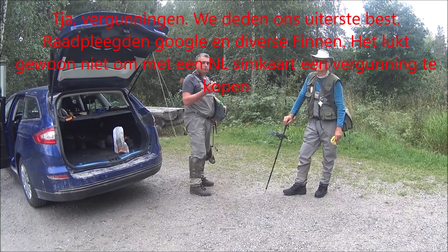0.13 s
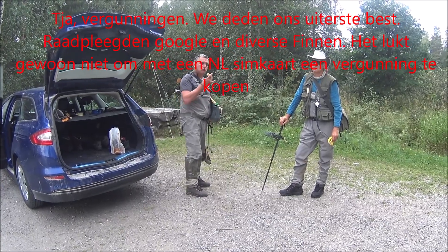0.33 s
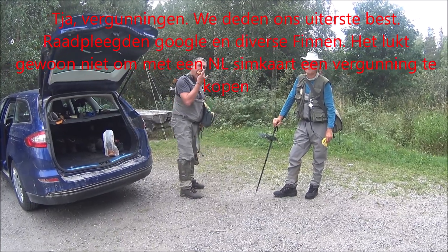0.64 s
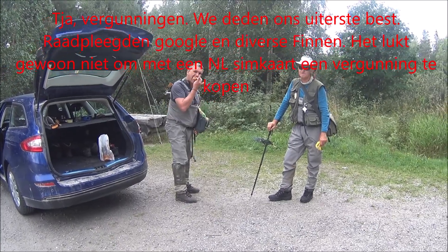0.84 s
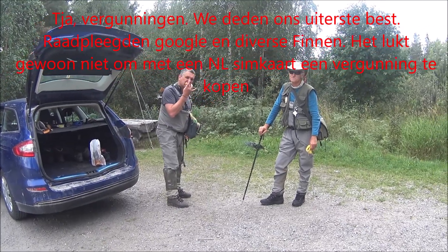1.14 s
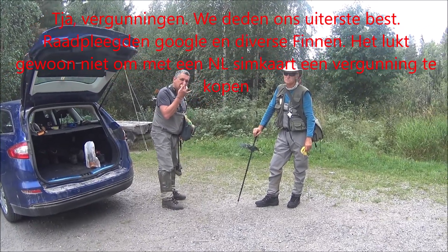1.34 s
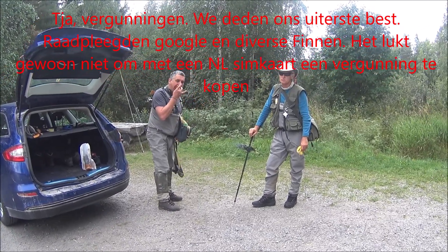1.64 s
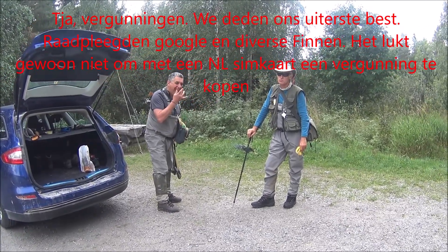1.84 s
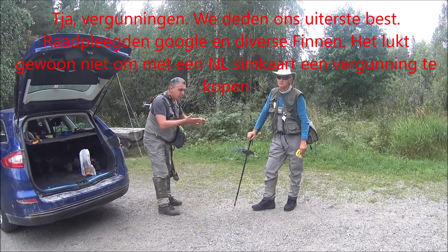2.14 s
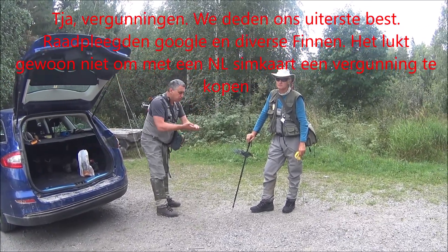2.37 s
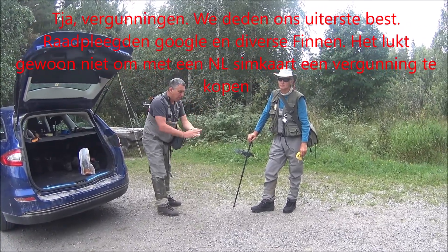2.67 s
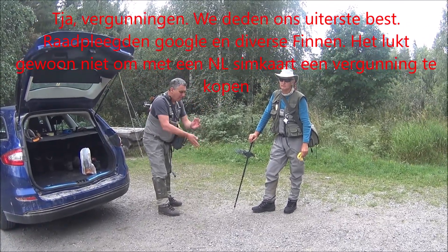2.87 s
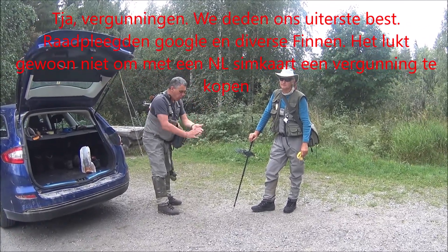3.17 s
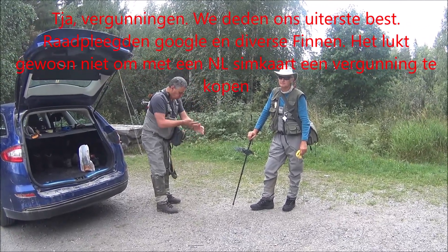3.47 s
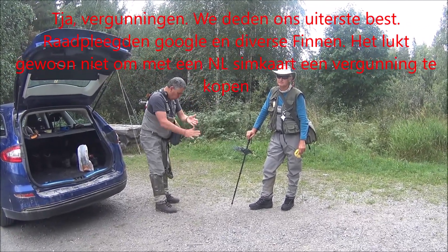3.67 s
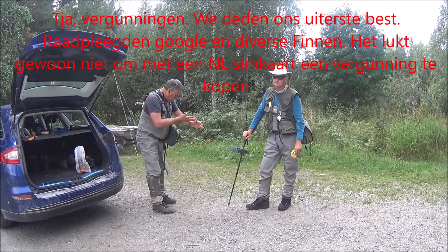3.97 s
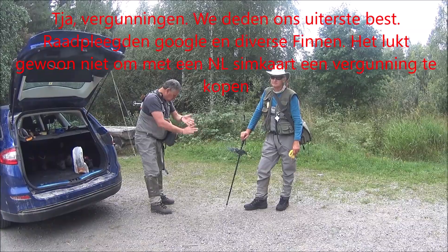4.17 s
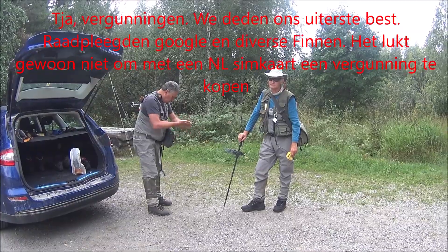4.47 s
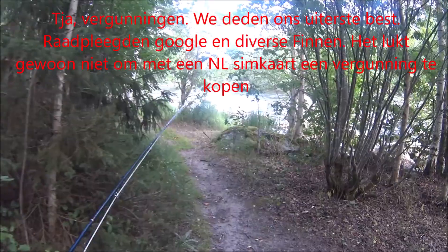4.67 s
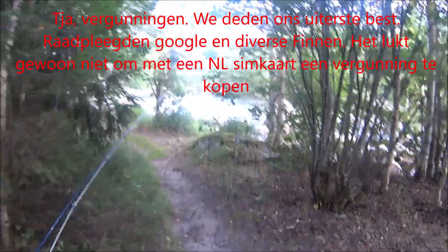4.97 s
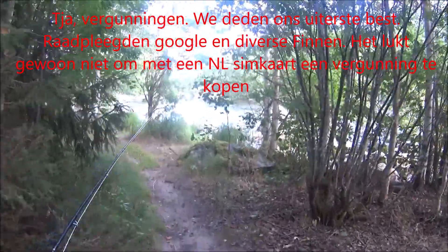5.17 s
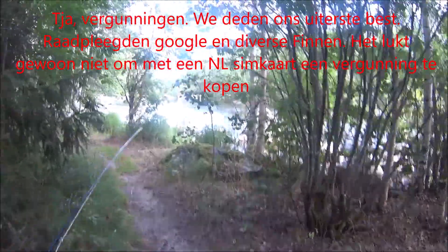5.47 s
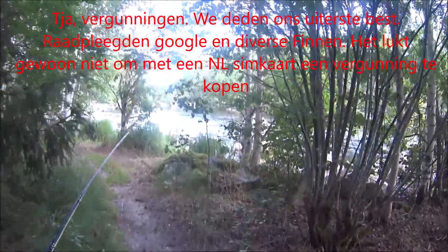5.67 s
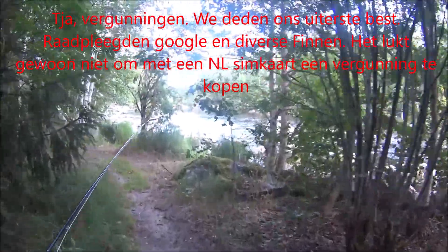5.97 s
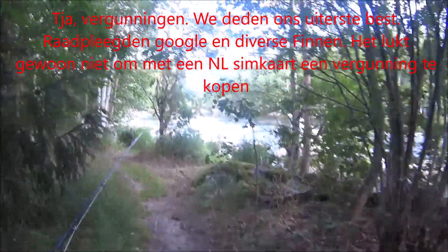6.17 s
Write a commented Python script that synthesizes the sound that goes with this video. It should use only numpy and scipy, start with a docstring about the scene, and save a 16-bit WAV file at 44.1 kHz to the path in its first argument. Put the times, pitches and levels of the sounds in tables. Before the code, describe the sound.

A muffled, boxy camera held still picks up a distant, steady water hush, one early slap with a clink, soft handling taps, then a run of crisp hand slaps with gear clicks. After a sudden cut the hush grows louder and ticks more densely, and the carried case gives hard hollow knocks, rattling clicks and scraping, ending on a loud bump.

```python
"""Hands slap together and gear clicks and clinks beside a small camera in a closed plastic case near a river.
The camera is first held still, then carried along a path. Slaps, and the sharp onset of the clink, are short
noise puffs with a resonant air pocket. Knocks and rubbing excite damped modes of the case walls; palm thumps
are low, fast-dying swings. Behind them, far water is steady noise coloured by the case cavity, with faint ticks
and a little hiss."""
import sys
import numpy as np
from scipy import signal
from scipy.fft import rfft, irfft
from scipy.io import wavfile
from scipy.ndimage import minimum_filter1d

SR = 44100
rng = np.random.default_rng(int(sys.argv[2]) if len(sys.argv) > 2 else 0)


def invert_db(level):
    """Linear amplitude ratio for a level in decibels (20 dB per decade), elementwise."""
    return 10 ** (np.asarray(level, dtype=float) / 20)


def generate_wav(sig):
    """Save sig (samples, or channels by samples) to the path in sys.argv[1] as 16-bit PCM at SR."""
    pcm = np.round(np.clip(np.atleast_2d(sig).T, -1, 1) * 32767).astype(np.int16)
    wavfile.write(sys.argv[1], SR, pcm)


N = 278271   # samples in the scene
SPAN = 8192   # samples in one event
CARRIED_S = 4.67   # the walk begins

# spectrum that the case lets through to the microphones: (frequency [Hz], relative level [dB per Hz])
CASE_RESPONSE = [(30, -36), (110, -29), (260, -13), (420, -15), (1080, -12), (1240, -2.5), (1340, 3),
                 (1480, -4), (1700, -7), (1980, -11), (2400, -5), (3400, -17), (4600, -15), (6000, -22.5),
                 (7800, -34), (10500, -50.5), (13500, -44.5), (16500, -38)]
# resonances of the case walls: (frequency [Hz], relative strength [dB])
CASE_WALL_MODES = [(590, 3), (690, -9), (790, 5), (970, 4.5), (1120, -4), (1250, 1.5), (1360, 4),
                   (1490, -1), (1610, 2), (1750, 3.5), (1900, -28), (2150, -2.5)]


def rms_one(x):
    """Normalisation to unit effective value."""
    return x / np.sqrt(np.mean(x ** 2, axis=-1, keepdims=True) + 1e-20)


def peak_one(x):
    """Normalisation to unit peak value."""
    return x / (np.max(np.abs(x), axis=-1, keepdims=True) + 1e-12)


def in_time(rows):
    """Envelope interpolation: straight lines between timed points, one curve per column."""
    s, *columns = np.transpose(rows)
    return [np.interp(np.arange(N) / SR, s, c) for c in columns]


def at_hz(points, hz):
    """Spectral interpolation: levels joined by straight lines over log frequency."""
    point_hz, point_db = np.transpose(points)
    return np.interp(np.log(hz + 1), np.log(point_hz), point_db)


def highpass(x, hz):
    """Second-order high-pass filtering."""
    return signal.sosfilt(signal.butter(2, hz, "high", fs=SR, output="sos"), x)


def lowpass(x, hz):
    """Second-order low-pass filtering."""
    return signal.sosfilt(signal.butter(2, hz, fs=SR, output="sos"), x)


def band(x, low_hz, high_hz, order=2):
    """Band-pass filtering with maximally flat response."""
    return signal.sosfilt(signal.butter(order, [low_hz, high_hz], "band", fs=SR, output="sos"), x)


def drift(rate_hz, channels=1):
    """Low-passed noise: a slow random wander of unit effective value, computed every 40 samples."""
    r = np.exp(-80 * np.pi * rate_hz / SR)
    noise = rng.standard_normal((channels, N // 40 + 2002))
    slow = signal.lfilter([1], [1, -2 * r, r * r], noise)[:, 2000:]
    return np.array([np.interp(np.arange(N) / 40, np.arange(len(s)), s) for s in rms_one(slow)])


def through(x, points):
    """Minimum-phase filtering: the folded cepstrum gives the causal response of a given spectrum."""
    hz = np.arange(SPAN // 2 + 1) * SR / SPAN
    cepstrum = irfft(np.log(invert_db(at_hz(points, hz))))
    cepstrum[1:SPAN // 2] *= 2
    cepstrum[SPAN // 2 + 1:] = 0
    response = irfft(np.exp(rfft(cepstrum)))[:SPAN // 2]
    return signal.fftconvolve(x, response[None], axes=1)[:, :x.shape[1]]


def place(times, sounds):
    """Superposition: stereo sounds (events, 2, samples) add up at their times."""
    out = np.zeros((2, N + SPAN))
    for s, sound in zip(times, sounds):
        start = round(s * SR)
        out[:, start:start + sound.shape[1]] += sound
    return out[:, :N]


def spread(mid, side):
    """Partial coherence: two microphones share most of the sound; a weaker part differs."""
    # weight of the differing part: (frequency [Hz], filter gain [dB])
    side_gain = [(60, -22), (150, -18), (380, -4), (950, -11.5), (2380, -8.5), (5980, -10), (15000, -10)]
    side = through(side, side_gain)
    return np.stack([mid + side, mid - side], axis=-2)


def airborne():
    """Impulsive sources in air: columns of time, treble dB, middle and bass dB re treble, ms, pocket Hz."""
    # hand slaps, and the sharp onset of the clink at 0.266 s: (time of peak [s], treble peak [dB], # bass re
    # treble [dB], length scale [ms], air-pocket pitch [Hz])
    slaps_and_clink_onset = [(0.2661, -16.5, -3.5, 0.53, 5600), (2.3671, -11.5, -7.5, 1.96, 3450),
                             (2.7141, -12.5, -15, 1.5, 1780), (2.968, -18.5, 0.5, 2.24, 2470),
                             (3.1984, -8, -22, 1.13, 2900), (3.4137, -14, -1, 2.3, 2630),
                             (3.654, -9.5, -41, 0.9, 2660), (3.8932, -8, -6, 1.16, 2770),
                             (4.1492, -7.5, -48, 0.78, 2880), (4.4213, -13, -10.5, 0.9, 2940),
                             (5.0722, -14.5, -21, 0.92, 4900)]
    # thin bright ticks and swishes, perhaps fingers parting or cloth:
    # (time [s], treble peak [dB], length scale [ms], pocket pitch [Hz])
    bright_ticks = [(0.283, -28, 5.3, 5640), (0.324, -38.5, 25, 5750), (0.531, -34, 0.65, 4570),
                    (1.476, -36.5, 0.59, 4480), (1.8162, -32, 0.34, 5700), (1.8587, -38, 0.5, 5030),
                    (1.884, -38, 1.3, 4900), (2.816, -29.5, 0.78, 5660), (2.958, -30, 0.59, 4900),
                    (3.006, -39, 17, 5400), (3.114, -27.5, 0.46, 6300), (3.286, -27.5, 0.8, 6600),
                    (3.779, -34.5, 0.81, 6100), (4.0155, -22, 0.2, 5800), (4.2835, -22, 0.48, 6340),
                    (4.5059, -28, 0.19, 5170), (4.944, -33, 0.8, 5300), (4.999, -34, 0.98, 5340),
                    (5.0957, -17, 0.49, 4800), (5.107, -35, 1.2, 8100), (5.1395, -27, 0.4, 4150),
                    (5.5676, -25, 0.5, 5570), (6.205, -33, 1.4, 6000), (6.233, -34.5, 2.3, 5000)]
    # gear clicking against the case: (time [s], treble peak [dB], middle re treble [dB], bass re middle [dB])
    gear_clicks = [(0.7032, -39.5, 4.5, -1), (2.4035, -28, 4, -9), (2.413, -21.5, 7, -5),
                   (2.4176, -17.5, -3.5, 3), (2.4351, -22, 8.5, -7), (2.4417, -20, 7.5, -2),
                   (2.5396, -27, -4, 8.5), (4.0372, -20.5, 15, 0), (5.0859, -21, 4.5, -12),
                   (5.118, -22, 6.5, -8), (5.2019, -19.5, 6, -12), (5.3585, -39.5, 15.5, -7),
                   (5.429, -32, 0.5, -14), (5.533, -33.5, 11, -7), (5.679, -23.5, 4, -5),
                   (5.7381, -20.5, 3.5, -19), (6.211, -24, -4, -21)]

    rows = [(s, db, -0.5, bass, ms, hz) for s, db, bass, ms, hz in slaps_and_clink_onset]
    rows += [(s, db, -28, -27, ms, hz) for s, db, ms, hz in bright_ticks]
    for s, db, middle, bass in gear_clicks:
        ms = 0.71 + 0.04 * (middle - 5)   # clicks with a stronger middle last longer
        rows.append((s, db, middle, middle + bass, ms, 2380))
    return np.transpose(rows)[:, :, None]


def pocket(puffs, pocket_hz, boost_db, q):
    """Cavity resonance: each puff rings briefly at its own pitch."""
    out = []
    for puff, hz in zip(puffs, pocket_hz):
        r = np.exp(-np.pi * hz / q / SR)
        poles = [1, -2 * r * np.cos(2 * np.pi * hz / SR), r * r]
        rung = signal.lfilter([(1 - r * r) / 2, 0, (r * r - 1) / 2], poles, puff)
        out.append(puff + invert_db(boost_db) * rung)
    return np.array(out)


def slaps(rise=1.1, fall=1.64, crackle_db=5.0, scatter_db=-15, far_db=-33, far_t60=0.43,
          top_db=-24, bright=0.73, wide_db=-6):
    """Impulsive radiation: a crackling noise puff swells and dies, then near scatter and a faint wash."""
    # edges of the bass, middle, treble and top bands: (frequency [Hz])
    slap_edges = [250, 1850, 3400, 11500, 16700]
    lead_s = 0.008   # room for the swell before the peak
    s, treble_db, middle, bass, ms, pocket_hz = airborne()
    t = np.arange(SPAN) / SR - lead_s
    after = np.maximum(t, 0)
    length = np.clip(ms, .2, 30) / 1000

    swell = np.minimum(t, 0) / np.minimum(rise * length, .003)
    puff = np.exp(swell - after / (fall * length))
    puff = puff * invert_db(crackle_db * (rng.standard_normal((len(s), SPAN)) - 0.5))
    scatter_t60 = 0.025 + 25 * length   # broader slaps scatter longer
    scatter = invert_db(scatter_db - 60 * after / scatter_t60)
    wash = invert_db(far_db - 60 * after / far_t60)
    shape = puff + np.minimum(after / 0.0051, 1) * (scatter + wash)

    noise = rng.standard_normal((len(s), 2, SPAN)) * shape[:, None]
    noise = signal.lfilter([1, -bright], [1], noise)   # a slap is brighter than far water
    noise = pocket(noise, pocket_hz[:, 0], boost_db=8.0, q=9.0)
    mid, side = through(noise[:, 0], CASE_RESPONSE), through(noise[:, 1], CASE_RESPONSE)
    out = 0
    for low_hz, high_hz, rel_db in zip(slap_edges, slap_edges[1:], [bass, middle, 0, top_db]):
        part = band(mid, low_hz, high_hz, order=3)
        apart = band(side, low_hz, high_hz, order=3)
        gain = invert_db(treble_db + rel_db) / np.max(np.abs(part), axis=1, keepdims=True)
        out = out + np.array([part * gain, apart * gain * invert_db(wide_db)])
    return place(s[:, 0] - lead_s, spread(*out))


def clink(start_s=0.266, level_db=-12.5, contact_ms=0.8, wide_db=-14):
    """Modal superposition: one blow on a hard piece of tackle starts all its damped modes."""
    # modes of the struck piece: (frequency [Hz], relative level [dB], decay t60 [s])
    clink_modes = [(1180, -25, 0.37), (1310, -5.5, 0.058), (1510, 2, 0.04), (2470, -13, 0.042),
                   (2760, -16, 0.057), (4360, -20, 0.073), (5300, -15, 0.056), (5910, -14, 0.054)]
    hz, mode_db, t60 = np.transpose(clink_modes)[:, :, None]
    t = np.arange(SPAN) / SR
    phase = rng.random(hz.shape)   # in turns
    rings = invert_db(level_db + mode_db - 60 * t / t60) * np.sin(2 * np.pi * (hz * t + phase))
    rings = rings * (1 - np.exp(-t * 1000 / contact_ms))
    mid = rings.sum(axis=0)
    side = invert_db(wide_db) * rng.standard_normal(len(hz)) @ rings   # the two microphones hear it differently
    return place([start_s], [np.array([mid + side, mid - side])])


def knocks(contact_ms=0.44, scatter=0.65, uneven_db=4, wide_db=-12):
    """Modal excitation: each blow starts the wall modes around its pitch, with new strengths."""
    # knocks on the case: (time [s], peak of the shared part [dB], centre pitch [Hz],
    # decay t60 [s], breadth [octaves])
    knock_table = [(0.723, -33.5, 1310, 0.048, 0.84), (0.831, -29.5, 1080, 0.041, 1),
                   (0.885, -28, 950, 0.021, 0.25), (0.904, -30.5, 1030, 0.069, 0.57),
                   (0.955, -37.5, 1180, 0.13, 0.53), (1.655, -39, 1300, 0.072, 1.6),
                   (1.672, -33.5, 750, 0.047, 1.2), (1.735, -30.5, 915, 0.056, 1.1),
                   (1.756, -29, 920, 0.055, 0.79), (1.846, -23, 1340, 0.019, 0.42),
                   (1.881, -23.5, 1330, 0.018, 0.3), (1.9, -27.5, 1410, 0.027, 0.43),
                   (1.915, -29.5, 1360, 0.026, 0.49), (2.201, -18.5, 905, 0.017, 0.52),
                   (2.475, -26.5, 1070, 0.048, 0.44), (2.539, -13.5, 1460, 0.016, 0.27),
                   (2.565, -29.5, 1200, 0.06, 0.46), (2.601, -23.5, 1470, 0.017, 0.44),
                   (2.616, -26.5, 1380, 0.037, 0.55), (3.591, -30, 1410, 0.024, 0.59),
                   (3.671, -29.5, 1380, 0.022, 0.49), (3.735, -29, 1430, 0.019, 0.39),
                   (3.8, -26.5, 1460, 0.016, 0.52), (3.83, -34, 883, 0.05, 1.9),
                   (3.894, -16, 1170, 0.038, 1.2), (4.034, -13.5, 1460, 0.069, 1.3),
                   (4.047, -28.5, 630, 0.054, 0.45), (4.217, -22, 1250, 0.022, 0.9),
                   (4.222, -39, 570, 0.093, 0.17), (4.594, -28.5, 960, 0.014, 1.4),
                   (4.632, -36, 830, 0.084, 0.18), (4.702, -22, 1430, 0.021, 0.47),
                   (4.857, -18.5, 1500, 0.019, 0.61), (4.93, -22.5, 1230, 0.08, 0.63),
                   (4.962, -24, 1140, 0.14, 1), (5.007, 3, 1226, 0.028, 0.53),
                   (5.039, -23.5, 900, 0.062, 0.71), (5.106, -20, 1390, 0.037, 0.5),
                   (5.139, -3.5, 1460, 0.02, 0.5), (5.145, -9, 940, 0.043, 0.16),
                   (5.148, -10.5, 1900, 0.03, 0.087), (5.178, -14, 1160, 0.022, 0.82),
                   (5.188, -12.5, 1210, 0.029, 0.78), (5.239, -19.5, 1420, 0.026, 0.5),
                   (5.539, -21, 1640, 0.022, 0.71), (5.573, -22.5, 1260, 0.033, 0.36),
                   (5.884, -25.5, 1360, 0.026, 0.35), (5.941, -11.5, 1170, 0.022, 0.65),
                   (5.951, -20.5, 1440, 0.021, 1.1), (6.063, -26, 1290, 0.018, 1.3),
                   (6.223, -26, 1010, 0.032, 2), (6.243, -10, 910, 0.024, 2.2), (6.262, 3, 1260, 0.03, 0.7),
                   (6.276, -12.5, 830, 0.038, 0.52)]
    s, peak_db, pitch_hz, t60, breadth = np.transpose(knock_table)[:, :, None]
    hz, mode_db = np.transpose(CASE_WALL_MODES)
    t = np.arange(SPAN // 2) / SR
    luck = rng.standard_normal((len(knock_table), 3, len(hz)))

    octaves_off = np.log2(hz / pitch_hz)
    nearness_db = -9.0 * (octaves_off / np.clip(breadth, .1, 2)) ** 2
    strength = invert_db(mode_db + nearness_db + uneven_db * luck[:, 0])
    decay = (1 - np.exp(-t * 1000 / contact_ms)) * invert_db(-60 * t / np.clip(t60, .008, .2))
    turn = 2 * np.pi * hz[:, None] * t
    # the cosine part scatters the starting phases
    mid = strength @ np.sin(turn) + (scatter * strength * luck[:, 1]) @ np.cos(turn)
    side = (strength * luck[:, 2]) @ np.sin(turn)
    mid = peak_one(band(mid * decay, 416, 2500, order=4)) * invert_db(peak_db)
    side = peak_one(band(side * decay, 470, 2600, order=4)) * invert_db(peak_db + wide_db)
    return place(s[:, 0], np.stack([mid + side, mid - side], axis=1))


def thumps(rise_ms=1.3, rough=0.51, t60=0.056):
    """Damped oscillation: a soft push gives a low swing that dies fast, roughened by dull noise."""
    # thumps of the palm, begun 5 ms ahead: (time [s], peak [dB], pitch [Hz])
    thump_table = [(0.731, -37, 158), (0.887, -33.5, 228), (1.78, -44, 150), (2.077, -47, 154),
                   (2.204, -30.5, 249), (2.419, -33.5, 321), (2.451, -31, 146), (2.485, -33, 194),
                   (2.621, -38.5, 163), (2.968, -44.5, 372), (3.204, -45, 149), (3.415, -33.5, 380),
                   (3.486, -31.5, 208), (3.795, -34.5, 162), (3.899, -26, 397), (4.051, -36, 362),
                   (4.232, -40.5, 336), (4.424, -29.5, 404), (5.516, -29.5, 146), (6.068, -41, 163),
                   (6.226, -33, 170)]
    s, peak_db, pitch_hz = np.transpose(thump_table)[:, :, None]
    t = np.arange(SPAN) / SR
    dull = rms_one(band(rng.standard_normal((len(thump_table), SPAN)), 90, 700))
    swing = np.sin(2 * np.pi * pitch_hz * t) + rough * dull
    envelope = (1 - np.exp(-t * 1000 / rise_ms)) * invert_db(-60 * t / t60)
    push = peak_one(swing * envelope) * invert_db(peak_db)
    return place(s[:, 0] - .005, np.stack([push, push], axis=1))


def grip(slips_per_s=900, size_db=3.0, slip_t60=0.015, lumps_db=3.5, wide_db=-11):
    """Stick-slip friction: skin and strap jerk and ring the walls; the holding hand rumbles in lumps."""
    # hand and strap rubbing on the case: (time [s], level [dB])
    rub_levels = [(0.0, -60.5), (0.66, -62), (0.9, -43), (1.1, -67.5), (1.6, -57), (1.85, -51.5),
                  (2.0, -58), (2.3, -56), (2.52, -42), (2.66, -52.5), (3.3, -60.5), (3.7, -53.5),
                  (4.55, -58.5), (4.76, -51), (5.06, -38.5), (5.27, -50), (6.04, -49), (6.31, -39.5)]
    rub_db, = in_time(rub_levels)
    held = np.arange(N) < CARRIED_S * SR
    rumble_db = rub_db + np.where(held, -14, -7)   # held still, carried

    slip_chance = slips_per_s * invert_db(4 * drift(15.0)) / SR
    slips = (rng.random((2, N)) < slip_chance) * rng.choice([-1, 1], (2, N))
    slips = slips * invert_db(size_db * np.minimum(rng.exponential(1, (2, N)), 4))
    dealt = rng.integers(0, len(CASE_WALL_MODES), (2, N))   # the one mode each slip rings
    r = invert_db(-60 / (slip_t60 * SR))
    rub = 0
    for k, (hz, mode_db) in enumerate(CASE_WALL_MODES):
        w = 2 * np.pi * hz / SR
        poles = [1, -2 * r * np.cos(w), r * r]
        rub = rub + signal.lfilter([0, invert_db(mode_db) * np.sin(w)], poles, slips * (dealt == k) + 1e-18)
    rub = rub / np.std(rub[0]) * invert_db(rub_db)

    rumble = band(rng.standard_normal((2, N)), 106, 217, order=3)
    rumble = rms_one(rumble * invert_db(lumps_db * drift(44.0))) * invert_db(rumble_db)
    mid, side = rub[0] + rumble[0], invert_db(wide_db) * rub[1]
    return np.array([mid + side, mid - side])


def river(flicker_db=1.0, ticks_per_s=60, tick_db=14, size_db=2.5):
    """Filtered broadband noise: far water wavers in level and brightness; leaves and gear tick faintly."""
    # river and leaves heard through the case: (time [s], level of the 2.3-6.4 kHz band [dB])
    rush_levels = [(0, -55), (3.6, -53.5), (4.668, -54.5), (4.674, -49.5), (5.0, -46.5), (5.3, -47),
                   (6.31, -46.5)]
    busy = invert_db(10 * (np.arange(N) > CARRIED_S * SR))   # ticks come more often on the move
    ticks = rng.random(N) < busy * ticks_per_s / SR
    ticks = ticks * invert_db(tick_db + size_db * np.minimum(rng.exponential(1, N), 3))
    ticks = highpass(ticks, 3000)
    heard = through(rng.standard_normal((2, N)) + ticks, CASE_RESPONSE)
    heard = heard / np.std(band(heard[0], 2287, 6400))
    low = lowpass(heard, 1900)
    waver = invert_db(flicker_db * drift(11.0, channels=2))   # low and high waver apart
    heard = (low * waver[0] + (heard - low) * waver[1]) * invert_db(in_time(rush_levels)[0])
    return spread(heard[:1], heard[1:])[0]


def hiss(level_db=-77, wide_db=-20):
    """Electronic noise: the amplifier's own steady hiss, at the very top of the spectrum."""
    mid, side = rms_one(band(rng.standard_normal((2, N)), 10500, 17300)) * invert_db(level_db)
    return np.array([mid + invert_db(wide_db) * side, mid - invert_db(wide_db) * side])


def limiter(x, ceiling_db=-6.5, attack_s=0.00086, release_db_per_s=350, hears_hz=2500, look_ahead=88):
    """Peak limiting: gain drops just ahead of low and middle peaks over the ceiling, then climbs steadily."""
    sensed = lowpass(x, hears_hz)
    over_db = np.maximum(20 * np.log10(np.max(np.abs(sensed), axis=0) + 1e-9) - ceiling_db, 0)
    over_db = -minimum_filter1d(-over_db, size=2 * look_ahead + 1)   # widened by look_ahead samples each way
    slope = release_db_per_s * np.arange(N) / SR
    held_db = np.maximum.accumulate(over_db + slope) - slope
    r = np.exp(-1 / (attack_s * SR))
    return x * invert_db(-signal.lfilter([1 - r], [1, -r], held_db))


def scene():
    """Linear superposition of all sources."""
    return slaps() + clink() + knocks() + thumps() + grip() + river() + hiss()


def low_pass(x):
    """Removes everything above the highest recorded frequency."""
    return signal.sosfilt(signal.butter(12, 16810, fs=SR, output="sos"), x)


def record(dry):
    """Band limitation and limiting: the deep bass is cut, peaks are limited, then the very top is cut."""
    without_bass = highpass(dry, 42)
    limited = limiter(without_bass)
    mix = signal.sosfilt(signal.cheby2(10, 60, 17100, fs=SR, output="sos"), limited)
    return low_pass(mix)


dry = scene()
out = record(dry)
generate_wav(out)
```